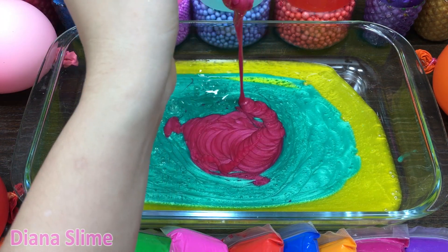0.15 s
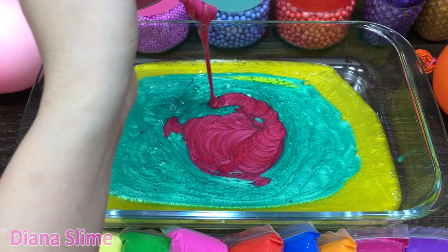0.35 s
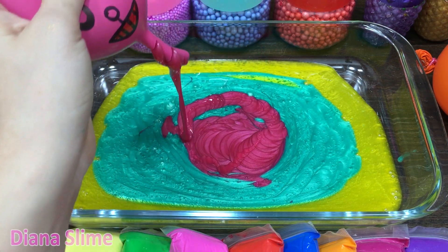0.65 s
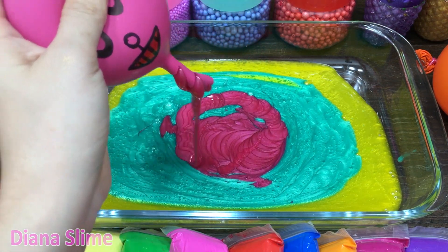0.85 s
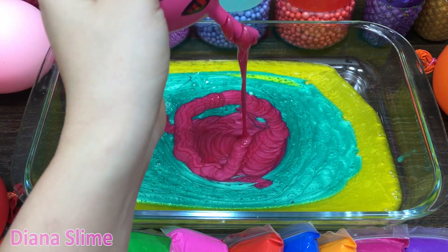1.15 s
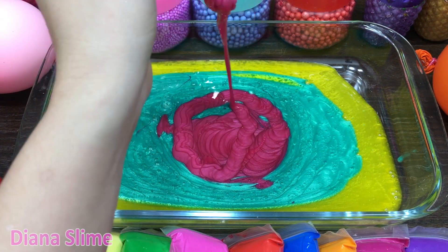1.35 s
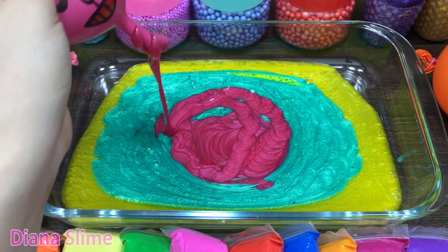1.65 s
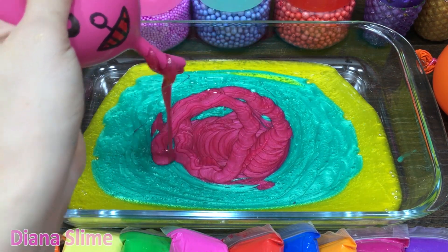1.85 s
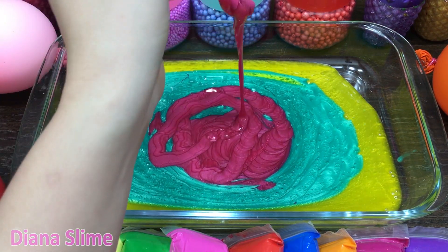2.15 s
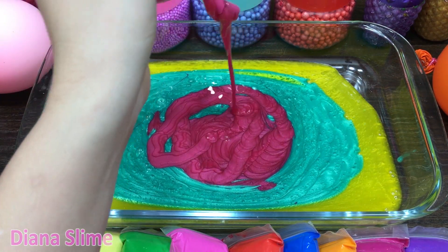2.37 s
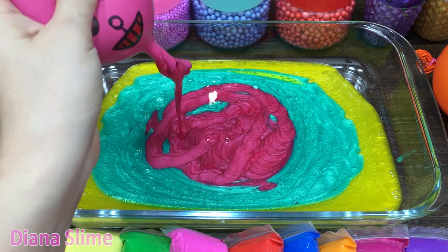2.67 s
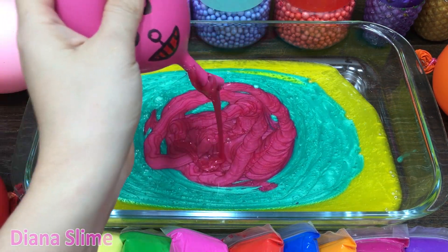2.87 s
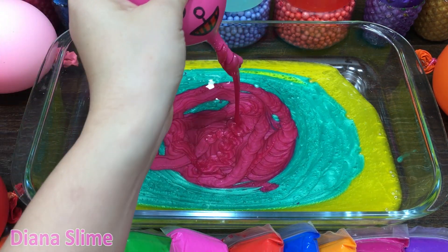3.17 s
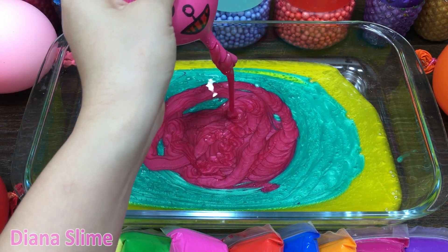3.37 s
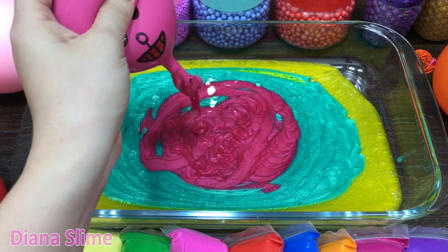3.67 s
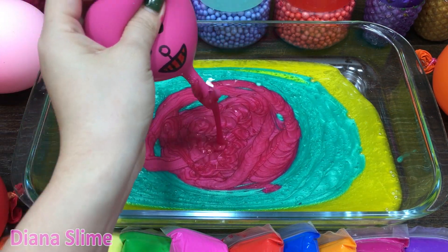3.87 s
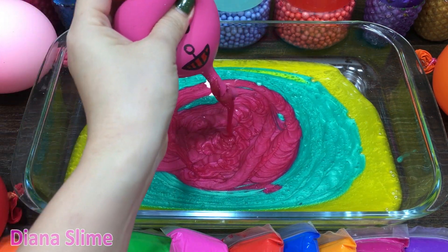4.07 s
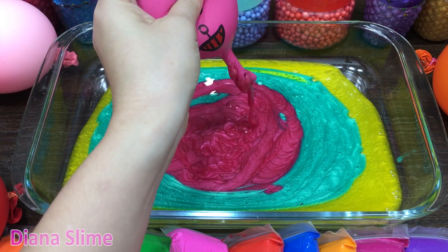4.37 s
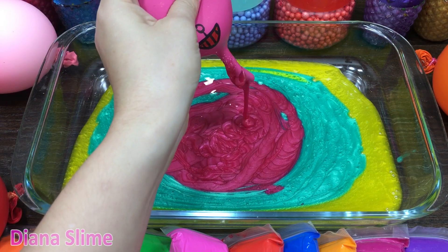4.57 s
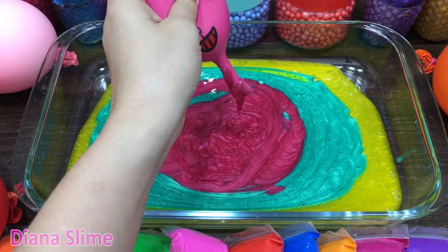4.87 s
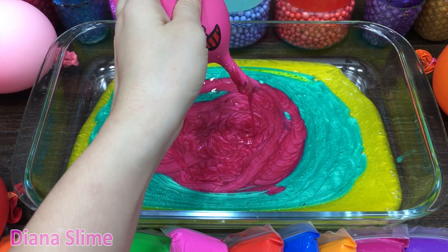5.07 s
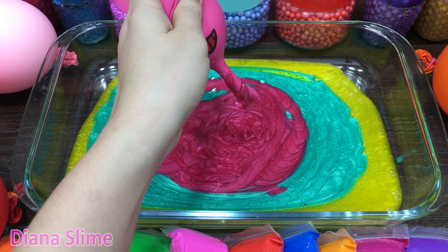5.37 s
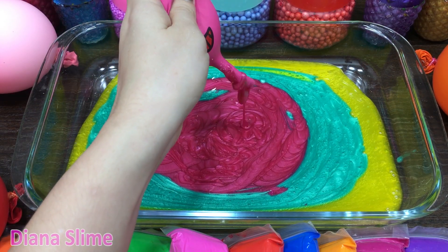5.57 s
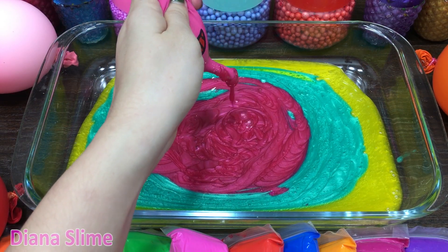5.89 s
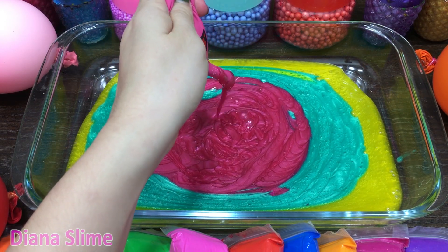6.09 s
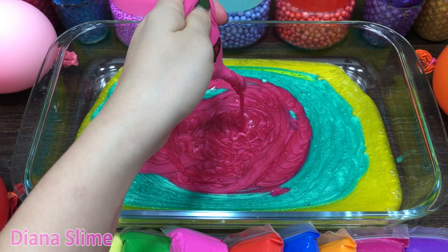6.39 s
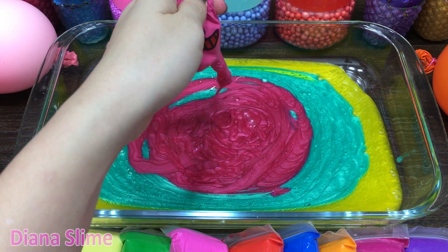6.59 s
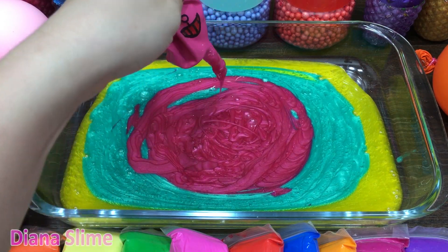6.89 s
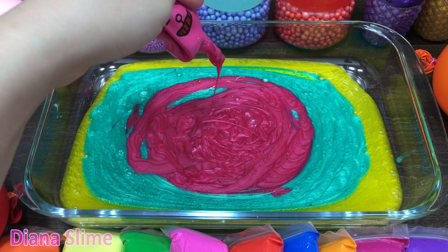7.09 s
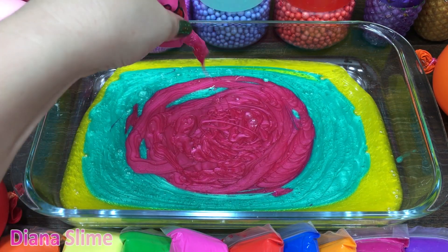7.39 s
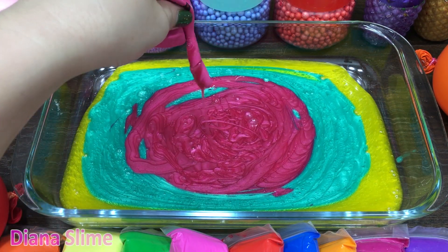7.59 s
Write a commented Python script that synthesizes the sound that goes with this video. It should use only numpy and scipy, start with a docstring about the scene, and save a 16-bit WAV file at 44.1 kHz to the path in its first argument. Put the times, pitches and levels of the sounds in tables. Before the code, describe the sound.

A sharp rubber snap, then wet, bubbly spluttering in runs as air and slime are pushed through a balloon's neck, close up.

```python
"""Slime squeezed from a balloon

Thick slime is pushed out of a rubber balloon into a glass dish, close up in a quiet room.
Soft rubber ticks and one sharp snap lead in. Then trapped air splutters through the neck in runs that
slow as the pressure is spent: each bubble pops with a falling note and spits a short spray, and the air
left in the balloon rings, higher as it shrinks. Dull plops and faint sticky ticks come near the end."""
import sys
import numpy as np
from scipy import signal
from scipy.fft import rfft, irfft, next_fast_len
from scipy.io import wavfile

SR = 44100
rng = np.random.default_rng(int(sys.argv[2]) if len(sys.argv) > 2 else 0)


def wrap_up_sound(samples):
    """Save the sound to the file named by the first command line argument, as 16-bit audio."""
    columns = np.atleast_2d(samples).T
    # keep every value between -1 and 1, then stretch to whole-number steps
    tamed = np.clip(columns, -1, 1)
    steps = np.round(tamed * 32767).astype(np.int16)
    wavfile.write(sys.argv[1], SR, steps)


N = 341268
TIME = np.arange(N) / SR
GRAIN_MS = np.arange(2048) * 1000 / SR

# EQ of the room tone: f/Hz, level/dB
ROOM_EQ = [(15, -57.5), (25, -14.5), (87, -1), (160, -13), (416, -22), (1600, -31.5), (16000, -40)]
# the arm shifts over the table: t/s, level/dB
ARM_BUMPS = [(6.45, -48), (6.73, -59.5)]

# soft ticks of the handled rubber: t/s, level/dB
RUBBER_TICKS = [(.141, -48), (.153, -40), (.166, -43.5), (.219, -44.5), (.237, -45.5), (.376, -46),
                (.387, -45), (1.028, -40), (1.036, -38)]
# their EQ: f/Hz, level/dB
RUBBER_EQ = [(450, -14), (800, -8), (2300, -2), (10000, -36)]
# their hollow notes: f/Hz, width/Hz, level/dB
RUBBER_RINGS = [(985, 90, 8.5), (1870, 85, 10), (2580, 160, 5)]
# a lone small bubble bursting on the slime: t/s, f/Hz, level/dB
LONE_BLIP = (.787, 1620, -45.5)

# the snap, a quick run of cracks: t/s, level/dB
SNAP_CRACKS = [(1.0415, -19.5), (1.047, -23.5), (1.0528, -21.5), (1.0578, -24)]
# their EQ: f/Hz, level/dB
SNAP_EQ = [(100, -37.5), (170, 0.5), (520, -14.5), (750, -11), (2500, 1.5), (3500, -2.5), (4400, 1),
           (6400, -12), (7500, -5.5), (9500, -17.5), (12500, -5), (14000, -22)]
# notes left ringing by the snap: f/Hz, peak level/dB, t60/s
SNAP_NOTES = [(148, -45.5, 0.35), (5800, -50, .22), (13070, -37, 0.12)]

# small bubbles bursting at the lip: t/s, f/Hz, level/dB
LIP_BUBBLES = [(1.971, 3110, -52), (2.001, 4400, -44), (2.021, 7050, -45), (2.04, 1130, -44),
               (2.087, 7300, -41.5), (2.106, 1060, -42.5), (2.164, 1080, -36.5), (2.275, 1070, -38),
               (2.299, 1100, -41), (2.355, 6900, -34), (2.405, 1210, -35.5), (2.438, 5700, -32.5),
               (2.502, 1160, -42.5), (2.579, 4200, -40.5), (2.663, 6500, -29), (3.189, 7900, -35.5),
               (4.457, 4460, -27.5), (4.585, 8500, -27), (4.631, 7800, -31), (5.165, 9800, -45.5),
               (5.633, 1550, -39), (5.764, 6600, -40)]
# fader ride on the tiny bubbles between the big ones: t/s, level/dB
FIZZ_RIDE = [(1.99, -87), (2.05, -49.5), (2.35, -46.5), (2.56, -49.5), (2.8, -40), (3.05, -45), (3.25, -95),
             (3.6, -73), (3.67, -53), (3.87, -35), (4.15, -58.5), (4.62, -48.5), (4.8, -68.5), (5.57, -78),
             (5.62, -50.5), (6.35, -76.5)]
# changing voice of the neck: t/s, pop f/Hz, ring send/dB, closing pop against opening pop/dB
NECK_VOICE = [(2.0, 1010, 2.5, -28.5), (2.78, 950, -0.5, -11), (2.9, 940, 0, 10), (3.0, 945, 5, -2.5),
              (3.12, 910, 2.5, -18), (3.78, 1066, -2, -8.5), (4.15, 1170, -3.5, -27),
              (4.55, 1620, -4.5, -10), (4.75, 1440, -19, -6.5)]
# single bubbles breaking through as the flow starts or slows:
# t/s, pop level/dB, spit delay/ms, spit level/dB, spit half-length/ms, whistle f/Hz
SINGLE_BUBBLES = [(2.263, -40.5, 0.64, -33.5, 3.6, 7200), (2.3186, -33, 9.3, -50, 5.5, 7490.0),
                  (2.3916, -28, 0.94, -37, 4.5, 7340.0), (2.4533, -38, 6.4, -30.5, 3.6, 7400),
                  (2.6025, -30.5, 0.52, -40, 3.3, 7500), (2.6394, -31.5, 1.5, -31.5, 1.9, 7240),
                  (2.6768, -28.5, 1, -26.5, 4.5, 8150), (3.003, -51, 2.6, -25, 4.1, 7850.0),
                  (3.0185, -35, 3.6, -21, 4.5, 8150), (3.037, -34.5, 1.4, -20.5, 0.51, 8250.0),
                  (3.061, -29.5, 0.83, -23, 4.5, 5900), (3.078, -51, 3.8, -22, 3.8, 9700),
                  (3.104, -35.5, 3.1, -28.5, 2.2, 8200), (3.122, -34.5, 1.9, -27.5, 4.0, 8600),
                  (4.1165, -41, 3.2, -27, 0.76, 7200), (4.139, -46, 4, -21.5, 1.4, 7660),
                  (4.17, -40, 6.6, -29, 3.6, 7100), (4.197, -42.0, 3.6, -26.5, 3.9, 7250),
                  (4.2255, -65, 2, -30.5, 0.34, 7460), (4.245, -41, 4.1, -29.5, 2.9, 7300),
                  (4.277, -52.0, 4, -23, 1.9, 7600), (4.3095, -35, 5.5, -30.5, 2.9, 9650),
                  (4.339, -42, 3.3, -23, 0.94, 7300), (4.366, -35, 3.7, -26.5, 2.6, 9900),
                  (4.391, -37.0, 4.7, -21, 0.83, 7940), (4.4205, -34, 3.7, -25.5, 0.68, 6700),
                  (4.4455, -28.5, 6.2, -21, 4.7, 7100), (4.4695, -30, 7.5, -21, 3.2, 7200),
                  (4.496, -33, 6.9, -20.0, 1.5, 7560), (4.5195, -32.5, 13, -22.0, 2.6, 6900),
                  (4.5505, -34.0, 2.8, -23.5, 1.7, 7150), (4.573, -32, 4.8, -20.5, 2.3, 7270),
                  (4.6135, -32, 2.9, -21, 2.1, 7000), (4.6445, -35.5, 7.2, -26, 2.6, 7140),
                  (4.6855, -36.5, 6.8, -34, 4.9, 7120.0), (4.6993, -44, 2.4, -22.5, 1.4, 6100),
                  (4.7362, -63, 5.8, -28.5, 3.2, 6200), (4.796, -69, 3.1, -30, 0.6, 7200),
                  (4.8555, -64, 1.1, -26, 3.8, 6600), (4.9148, -45.5, 1.3, -58, 2.9, 6860.0),
                  (4.9427, -48, 2.35, -36.5, 1.78, 6850), (5.0415, -59, 0.75, -39, 2.1, 6140),
                  (5.1431, -45.5, 2.9, -44, 2.9, 5850), (5.6088, -49.5, 1, -22, 3.1, 6370),
                  (5.627, -49, 4.2, -34, 3.4, 9160.0), (5.644, -54, 5.6, -23.5, 2.3, 7800),
                  (5.678, -34.5, 4, -27, 5.7, 7750.0), (5.6914, -46, 5.1, -27.5, 11, 6750),
                  (5.721, -44, 4, -26, 2.4, 7640), (5.7494, -59, 5.2, -28, 7.5, 7200),
                  (5.839, -44.5, 1.3, -29, 3.9, 6030), (5.907, -36, 2.3, -40, 4.9, 6400),
                  (5.9168, -39, 2.9, -31, 2.3, 5800)]
# EQ of the bright spray: f/Hz, level/dB
SPRAY_EQ = [(1000, -11.5), (2000, -10.5), (2750, -4.5), (3700, -11.5), (5200, -8), (6300, -1.5),
            (7600, 0.5), (9200, -3), (10500, -4), (12300, -1.5), (13600, -4.5), (15300, -3)]
# EQ of the low gurgle: f/Hz, level/dB
GURGLE_EQ = [(60, -12), (150, 1.5), (280, 4), (820, -5), (1500, -14)]
# air cavity of the balloon: f/Hz, level before the regrip/dB, level after it/dB, width/Hz
CAVITY_MODES = [(4030, 16, 19.5, 22), (5190, 16, 20, 24), (5600, 19, 12, 24), (7380, 19.5, 19, 30)]
# the rings rise during a squeeze: t/s, nozzle f/Hz, cavity pitch/ratio
RING_TUNING = [(2.0, 3280, 1.0), (2.78, 3360, 1.022), (3.12, 3560, 1.112), (3.7, 3330, 1.095),
               (3.84, 3360, 1.107), (4.08, 3540, 1.19), (4.42, 3290, 1.19), (4.6, 3260, 1.18)]
# how open the cavity is to the nozzle: t/s, level/dB
CAVITY_OPENING = [(2.7, -5), (3.0, -1.5), (4.1, 0), (4.45, -12)]

# pace of three bubble runs, two fast ones and then the last air's slow spits: t/s, bubble rate/Hz
RUN_PACE = [
    [(2.696, 69), (2.74, 68), (2.755, 80), (2.8, 90), (2.814, 69), (2.94, 71), (2.995, 62)],
    [(3.678, 57.1), (3.757, 65.9), (3.869, 62.2), (4.105, 41.6)],
    [(5.974, 23.3), (6.017, 19.6), (6.114, 23.8), (6.204, 18.2), (6.27, 18)],
]
# force of the same runs; pops lead, spray follows: t/s, pop level/dB, spit level/dB, spit delay/ms
RUN_FORCE = [
    [(2.696, -25.5, -26, 1.95), (2.75, -22.5, -20.5, 2.14), (2.82, -24.5, -18, 3.84),
     (2.9, -35.5, -18.5, 5.1), (2.99, -32, -20.5, 2.9)],
    [(3.678, -30.5, -26, 1.1), (3.77, -25, -31.5, 1.08), (3.81, -26.5, -14, 2.57),
     (3.87, -39.5, -16.5, 6.3), (3.97, -36.5, -20.5, 6), (4.1, -39.5, -27.5, 1.4)],
    [(6.07, -56.5, -33.5, 5), (6.24, -67, -43.5, 3.2)],
]
# whistle of the spit, one per run: f/Hz
RUN_WHISTLES = [8370, 8320, 7800]

# big air pockets collapsing: t/s, level/dB
POCKET_PLOPS = [(4.699, -32.5), (4.943, -38), (5.589, -36.5), (5.601, -33), (5.629, -37)]
# their EQ: f/Hz, level/dB
PLOP_EQ = [(100, -13.5), (330, -2.5), (800, -0.5), (1150, -11.5), (3000, -22)]
# sticky ticks as the empty neck is lifted away: t/s, level/dB
STICKY_TICKS = [(6.504, -52), (6.9055, -51), (7.631, -50)]


def from_db(db):
    return 10 ** (np.asarray(db) / 20)


def unit_rms(x):
    return x / np.sqrt(np.mean(x ** 2) + 1e-20)


def with_energy(x, db):
    """Scale a grain to the energy of one millisecond at this rms level."""
    return x * from_db(db) / np.sqrt(np.sum(x ** 2) * GRAIN_MS[1] + 1e-20)


def add(track, s, grain):
    """Mix a grain in at time s."""
    at = int(s * SR)
    track[at:at + len(grain)] += grain[:N - at]


def curves_at(s, table):
    """Read each automation curve of a table at time s."""
    times, *columns = np.transpose(table)
    return [np.interp(s, times, column) for column in columns]


def eq(x, points):
    """Minimum-phase EQ through (f/Hz, level/dB) points; white noise keeps its power."""
    size = next_fast_len(N + len(GRAIN_MS)) * 2
    hz, db = np.transpose(points)
    bin_hz = np.arange(size // 2 + 1) * SR / size
    gain = unit_rms(from_db(np.interp(np.log(bin_hz + 1), np.log(hz), db)))
    cepstrum = irfft(np.log(gain))[:size // 2]
    cepstrum[1:] *= 2
    return irfft(rfft(x, size) * np.exp(rfft(cepstrum, size)))[:N]


def resonate(x, hz, width_hz):
    """A resonance with about unity gain at its centre, which may glide."""
    turn = np.exp(2j * np.pi * np.cumsum(np.broadcast_to(hz, x.shape)) / SR)
    r = np.exp(-np.pi * width_hz / SR)
    return 2 * np.real(turn * signal.lfilter([1 - r], [1, -r], x / turn + 1e-18))


def band(x, hz, width_hz):
    """Two resonances in series, for steeper skirts."""
    return resonate(resonate(x, hz, width_hz), hz, width_hz)


def bursts(rows, rise_ms, decay_ms):
    """One noise burst that swells and dies for each (t/s, level/dB) row."""
    track = np.zeros(N)
    envelope = (1 - np.exp(-GRAIN_MS / rise_ms)) * np.exp(-GRAIN_MS / decay_ms)
    for s, db in rows:
        add(track, s, with_energy(envelope * rng.standard_normal(len(envelope)), db))
    return track


def background(tone_db=-60.5, bump_s=0.073):
    """A steady bed of room tone, with two dull bumps through the table."""
    bumps = sum(from_db(db) * np.exp(-((TIME - s) / bump_s) ** 2) for s, db in ARM_BUMPS)
    rumble = unit_rms(band(rng.standard_normal(N), hz=60, width_hz=34))
    return from_db(tone_db) * eq(rng.standard_normal(N), ROOM_EQ) + bumps * rumble


def rubber_ticks():
    """The handled rubber ticks softly, with a hollow ring."""
    rubs = bursts(RUBBER_TICKS, rise_ms=2.0, decay_ms=5.6)
    hollow = sum(from_db(db) * resonate(rubs, hz, width) for hz, width, db in RUBBER_RINGS)
    return from_db(-6) * eq(rubs, RUBBER_EQ) + from_db(6) * hollow


def gulp(hz, db, decay_ms, q):
    """A wet, rough note: a short puff through the broad resonance of a small opening."""
    puff = rng.standard_normal(len(GRAIN_MS)) * np.exp(-GRAIN_MS / decay_ms)
    return with_energy(band(puff, hz, hz / q), db)


def snap(rattle_db=-5.5, ring_start_s=1.0475):
    """A run of cracks trails a weaker rattle and leaves a hollow body, a low thump and thin highs."""
    attack = bursts(SNAP_CRACKS, rise_ms=0.18, decay_ms=1.0)
    rattle = from_db(rattle_db) * bursts(SNAP_CRACKS, rise_ms=0.69, decay_ms=8.7)
    body = band(bursts(SNAP_CRACKS, rise_ms=1, decay_ms=24), hz=2500, width_hz=800)
    age = np.maximum(TIME - ring_start_s, 0)
    notes = sum(from_db(db - 60 * np.minimum(age / t60, 2)) * np.sin(2 * np.pi * hz * age)
                for hz, db, t60 in SNAP_NOTES)
    return eq(attack + rattle, SNAP_EQ) + body + notes


def lip_bubbles(crack_db=-9.5):
    """Small bubbles burst at the lip, each with a short note and a tiny crack."""
    notes = np.zeros(N)
    for s, hz, db in LIP_BUBBLES:
        add(notes, s, gulp(hz, db, decay_ms=1.7, q=2.0))
    cracks = bursts([(s, db + crack_db) for s, _, db in LIP_BUBBLES], rise_ms=0.17, decay_ms=1.0)
    return notes, cracks


def fizz(per_s=600, spread_db=5.0, burst_ms=0.64):
    """Tiny bubbles burst at random while air is flowing."""
    triggers = (rng.random(N) < per_s / SR) * from_db(spread_db * rng.standard_normal(N))
    envelope = signal.fftconvolve(triggers, GRAIN_MS * np.exp(-GRAIN_MS / burst_ms))[:N]
    ride_db, = curves_at(TIME, FIZZ_RIDE)
    return unit_rms(envelope * rng.standard_normal(N)) * from_db(ride_db)


def balloon_rings(jolts, nozzle_db=14.5, regrip_s=3.4):
    """Jolts ring the nozzle and the air cavity, whose modes change balance as the hand regrips."""
    nozzle_hz, tuning = curves_at(TIME, RING_TUNING)
    opening = from_db(curves_at(TIME, CAVITY_OPENING)[0])
    nozzle = from_db(nozzle_db) * resonate(jolts, nozzle_hz, width_hz=27)
    cavity = sum(from_db(np.where(TIME < regrip_s, before, after)) * resonate(jolts, hz * tuning, width)
                 for hz, before, after, width in CAVITY_MODES)
    # the more the cavity takes of each jolt, the less is left for the nozzle
    return opening * cavity + nozzle / np.sqrt(opening)


def pop(hz, db, glide=0.97, glide_cycles=0.62, decay_cycles=2.02):
    """A bubble pops: its note drops toward hz and dies within a few cycles."""
    cycles = GRAIN_MS * hz / 1000
    pitch = hz * (1 + glide * np.exp(-cycles / glide_cycles))
    envelope = np.exp(-(cycles / decay_cycles) ** 1.5)
    return with_energy(np.sin(2 * np.pi * np.cumsum(pitch) / SR) * envelope, db)


def spit(delay_ms, half_ms, whistle_hz, grit_db=4.0, whistle_db=15.0, side_db=8.0, rise=.07):
    """Air tears through the wet gap: spray swells and is pinched off, whistling up as the gap narrows."""
    past_peak = (GRAIN_MS - delay_ms) / half_ms
    swell = np.exp(np.minimum(past_peak / 1.3, -past_peak))
    spray = rng.standard_normal(len(swell)) * from_db(grit_db * rng.standard_normal(len(swell))) * swell
    # weaker side whistles, different each time
    sides = sum(resonate(spray, hz * np.exp(spread * rng.normal()), width_hz=500) * rng.uniform(.5, 1.5)
                for hz, spread in ((4700, .2), (11000, .11), (15000, .03)))
    whistle = resonate(spray, whistle_hz * (1 + rise * np.tanh(past_peak / 2)), width_hz=350)
    return spray + from_db(whistle_db) * whistle + from_db(side_db) * sides


def neck_bubbles(rows, pop_db=-0.5, gulp_db=-6.0, crack_db=-3.0, gurgle_db=-18.5):
    """Each bubble cracks open with a gulp, pops, spits, gurgles and pops again as the neck closes."""
    pops, spray, gurgle, jolts = np.zeros((4, N))
    for s, open_db, delay_ms, spit_db, half_ms, whistle_hz in rows:
        hz, ring_db, closing_db = curves_at(s, NECK_VOICE)
        crack = rng.standard_normal(len(GRAIN_MS)) * np.exp(-GRAIN_MS / .5)
        slosh = rng.standard_normal(len(GRAIN_MS)) * np.exp(-np.abs(GRAIN_MS - delay_ms) / 8.7)
        jolt_db = (open_db + spit_db) / 2
        size = NECK_VOICE[0][1] / hz  # smaller, higher bubbles crack more softly
        add(spray, s, size * with_energy(crack, jolt_db + crack_db))
        add(pops, s, pop(hz * np.exp(.1 * rng.normal()), open_db + pop_db))
        add(pops, s, gulp(2 * hz * np.exp(.31 * rng.normal()), open_db + gulp_db, decay_ms=1.3, q=1.4))
        add(pops, s + (delay_ms + half_ms) / 1000, pop(hz * .9, open_db + closing_db))
        add(spray, s, with_energy(spit(delay_ms, half_ms, whistle_hz), spit_db))
        add(jolts, s, with_energy(crack, jolt_db + ring_db))
        add(gurgle, s, with_energy(slosh, spit_db + gurgle_db))
    return pops, spray, gurgle, jolts


def run_beats(pace):
    """Bubble times in one run, spaced by its pace."""
    times, per_s = np.transpose(pace)
    beats, s = [], times[0]
    while s < times[-1]:
        beats.append(s)
        s += 1 / np.interp(s, times, per_s)
    return np.array(beats)


def bubble_runs(base_half_ms=1.35, pop_spread_db=2.5, spit_spread_db=2):
    """While air flows the neck bubbles in runs: fast under pressure, slow thin spits at the end."""
    rows = []  # columns as in SINGLE_BUBBLES
    starting_rate = RUN_PACE[0][0][1]
    for pace, force, whistle_hz in zip(RUN_PACE, RUN_FORCE, RUN_WHISTLES):
        beats = run_beats(pace)
        rate, = curves_at(beats, pace)
        pop_db, spit_db, delay_ms = curves_at(beats, force)
        half_ms = base_half_ms * np.sqrt(starting_rate / rate)  # slower pace, longer spits
        chance = rng.standard_normal((len(beats), 5)).T
        pop_db += pop_spread_db * chance[0]
        spit_db += spit_spread_db * chance[1]
        delay_ms *= np.exp(.2 * chance[2])
        half_ms *= np.exp(.35 * chance[3])
        rows += zip(beats, pop_db, delay_ms, spit_db, half_ms, whistle_hz * np.exp(.089 * chance[4]))
    return rows


def splutter(fizz_note_db=1.5, crackle_send_db=-8.5):
    """Trapped air leaves the neck as big bubbles and fine crackle; both set the balloon ringing."""
    pops, spray, gurgle, jolts = neck_bubbles(bubble_runs() + list(SINGLE_BUBBLES))
    lip_notes, lip_cracks = lip_bubbles()
    froth = fizz()
    pop_hz, ring_db, _ = curves_at(TIME, NECK_VOICE)
    fizz_notes = from_db(fizz_note_db + ring_db / 2) * band(froth, 1.39 * pop_hz, width_hz=1150)
    crackle = froth + lip_cracks
    rings = balloon_rings(jolts + crackle * from_db(ring_db + crackle_send_db))
    return pops + lip_notes + fizz_notes + rings + eq(spray + crackle, SPRAY_EQ) + eq(gurgle, GURGLE_EQ)


def plops():
    """Big air pockets collapse with a soft, dull squelch."""
    return eq(bursts(POCKET_PLOPS, rise_ms=0.7, decay_ms=3.1), PLOP_EQ)


def sticky_ticks():
    """The slime unsticks in tiny, bright ticks."""
    return eq(bursts(STICKY_TICKS, rise_ms=0.34, decay_ms=3.3), SPRAY_EQ)


def room(x, t60_s=0.25, build_s=0.0022, damping_hz=9000):
    """Diffuse tail of a small furnished room, a little duller than the direct sound."""
    t = TIME[:SR // 2]
    tail = rng.standard_normal(len(t)) * from_db(-60 * t / t60_s) * (1 - np.exp(-t / build_s))
    tail = signal.sosfilt(signal.butter(1, damping_hz, fs=SR, output="sos"), tail)
    return signal.fftconvolve(x, tail / np.sqrt(np.sum(tail ** 2)))[:N]


def scene(near_send_db=-15.0, far_send_db=-14.0):
    """Mono mix: the neck is nearest the microphone; snap and ticks carry a touch more room."""
    near = splutter() + plops()
    blip_s, blip_hz, blip_db = LONE_BLIP
    add(near, blip_s, gulp(blip_hz, blip_db, decay_ms=5.0, q=2.2))
    far = snap() + rubber_ticks() + sticky_ticks()
    reverb = room(from_db(near_send_db) * near + from_db(far_send_db) * far)
    return (near + far + reverb + background())[None]


def record(dry, low_cut_hz=46, top_cut_hz=15900):
    """The microphone sheds the deepest rumble; the top is cut steeply."""
    low_cut = signal.butter(4, low_cut_hz, "high", fs=SR, output="sos")
    top_cut = signal.ellip(10, .1, 70, top_cut_hz, fs=SR, output="sos")
    return signal.sosfilt(np.vstack([low_cut, top_cut]), dry)


dry = scene()
out = record(dry)
wrap_up_sound(out)
```